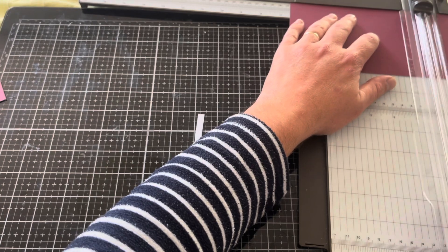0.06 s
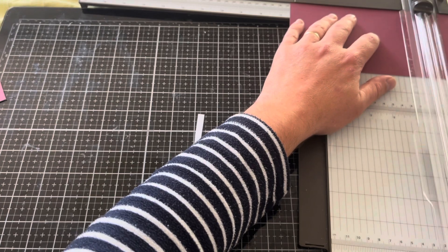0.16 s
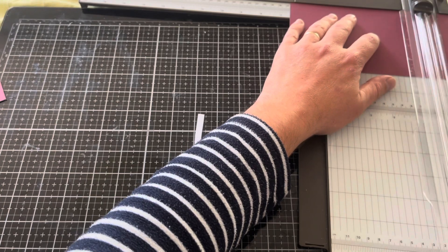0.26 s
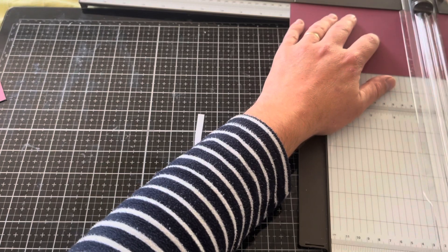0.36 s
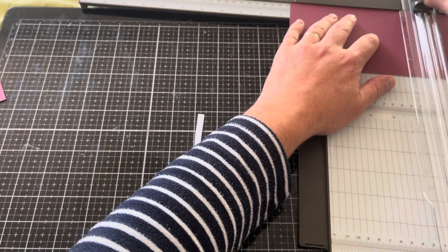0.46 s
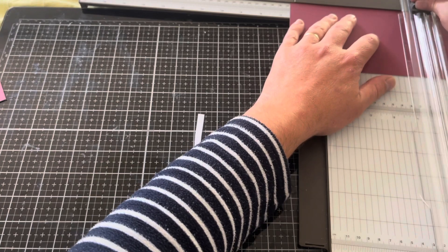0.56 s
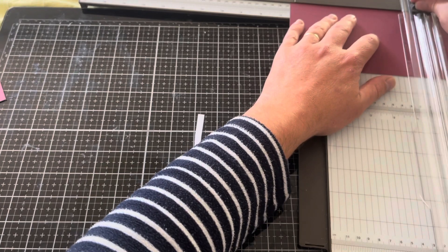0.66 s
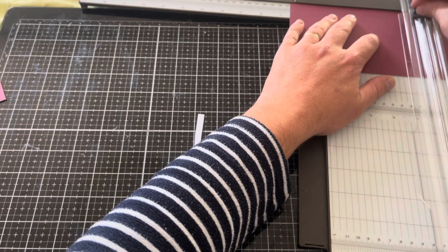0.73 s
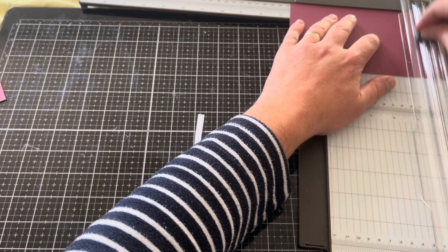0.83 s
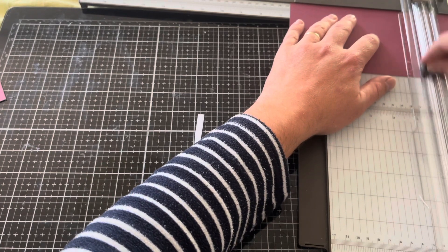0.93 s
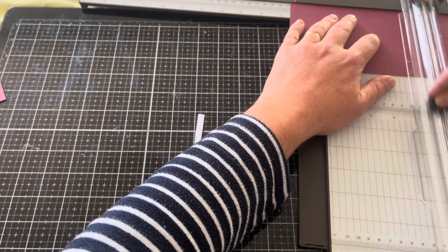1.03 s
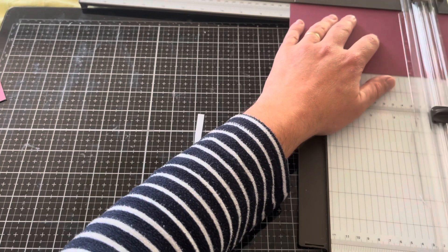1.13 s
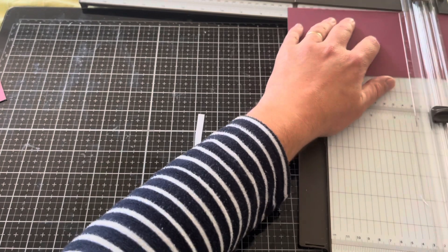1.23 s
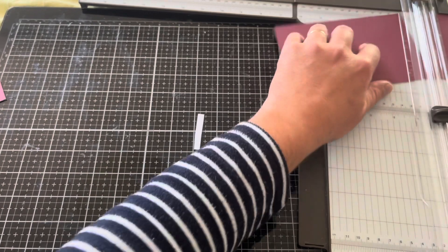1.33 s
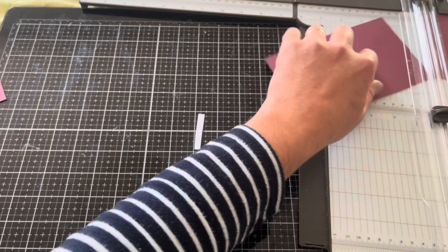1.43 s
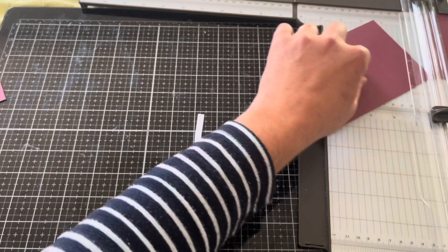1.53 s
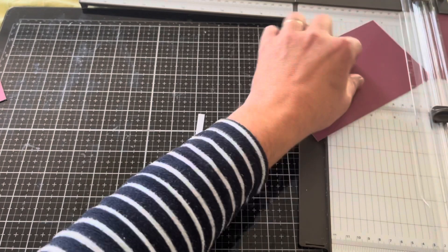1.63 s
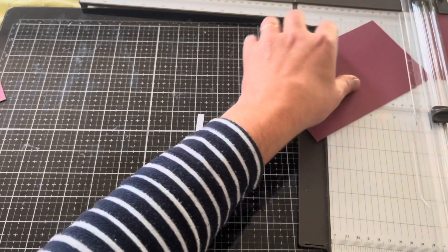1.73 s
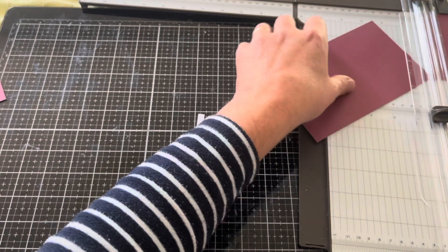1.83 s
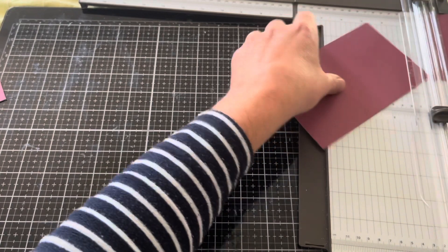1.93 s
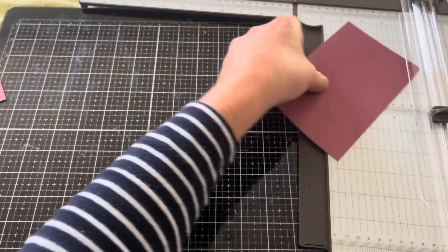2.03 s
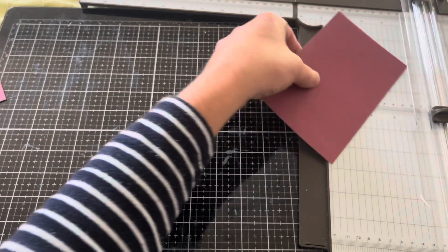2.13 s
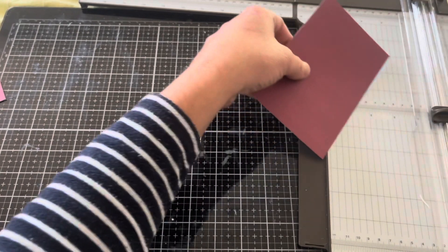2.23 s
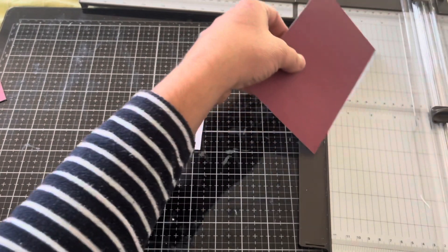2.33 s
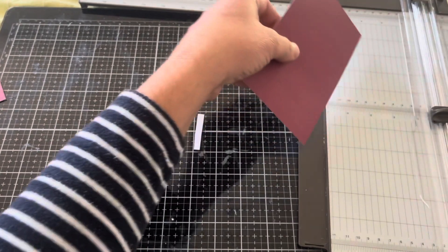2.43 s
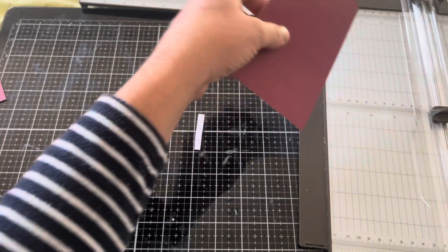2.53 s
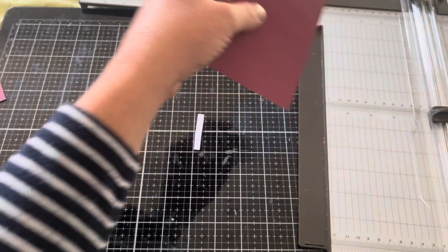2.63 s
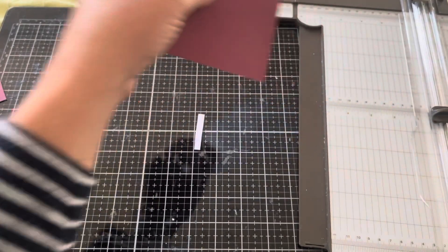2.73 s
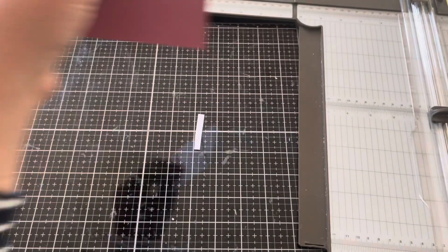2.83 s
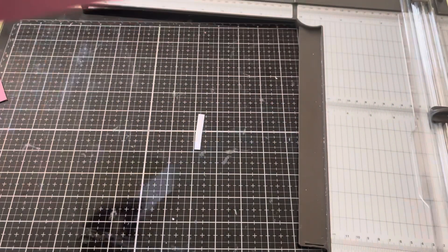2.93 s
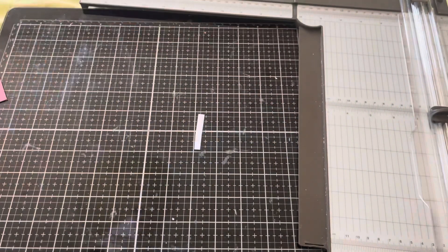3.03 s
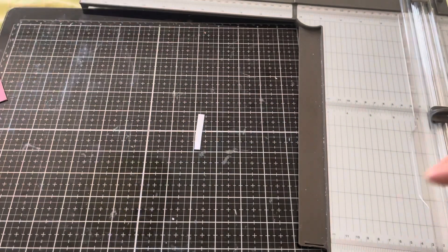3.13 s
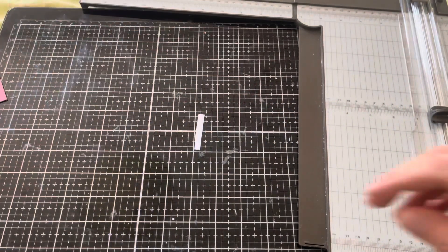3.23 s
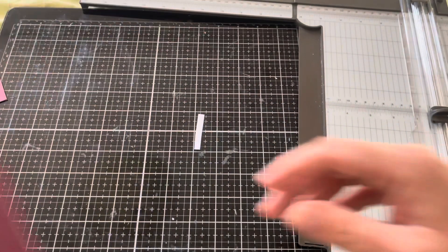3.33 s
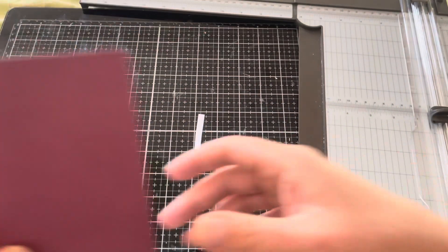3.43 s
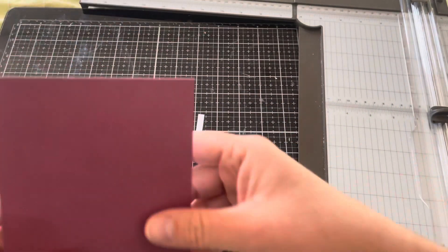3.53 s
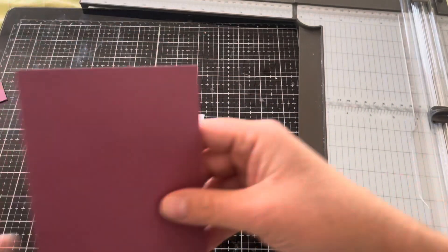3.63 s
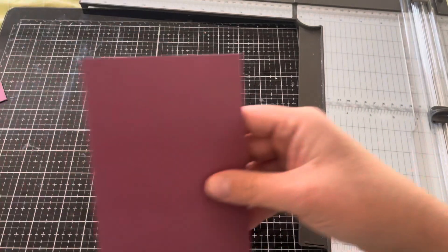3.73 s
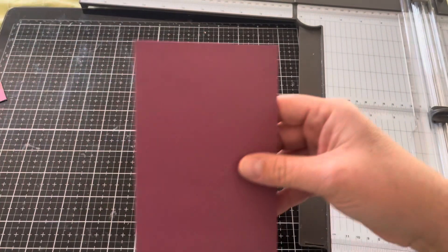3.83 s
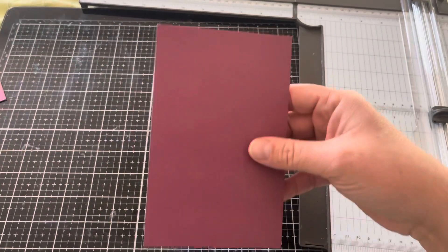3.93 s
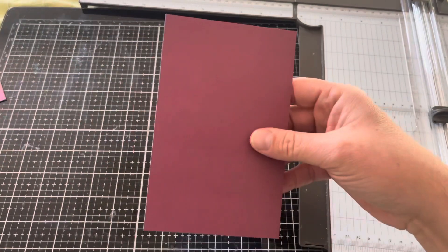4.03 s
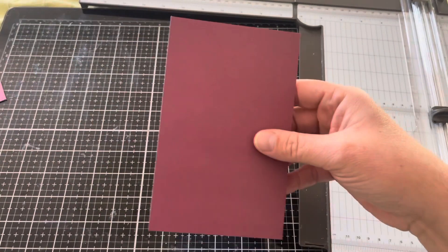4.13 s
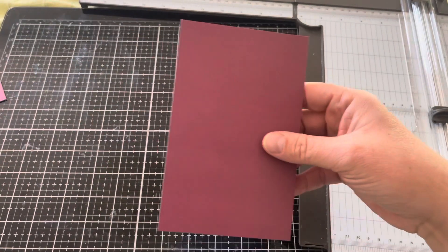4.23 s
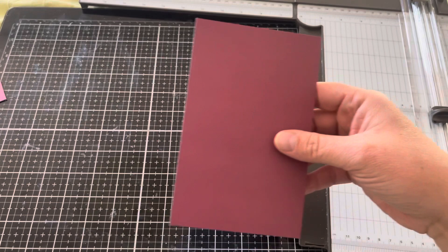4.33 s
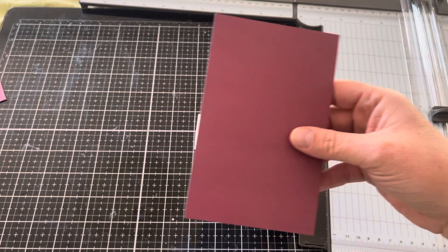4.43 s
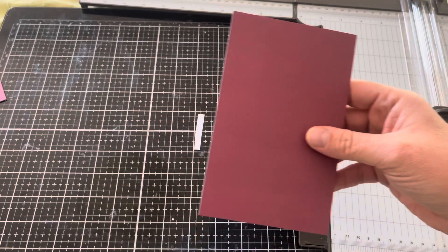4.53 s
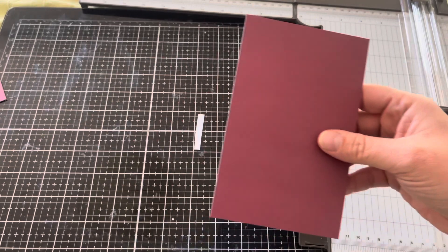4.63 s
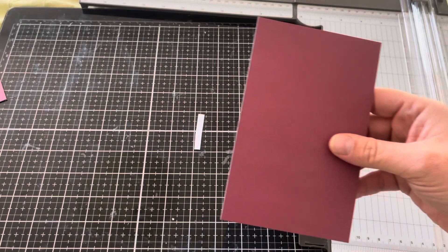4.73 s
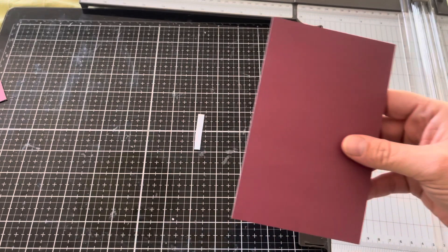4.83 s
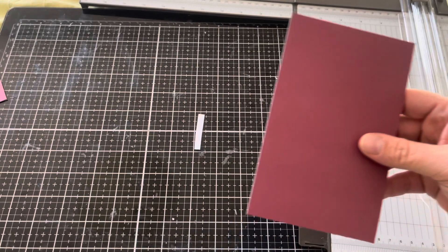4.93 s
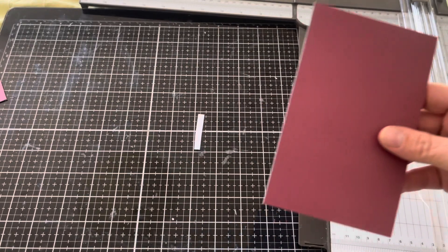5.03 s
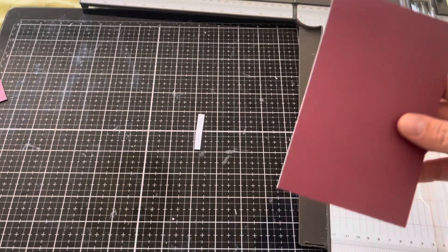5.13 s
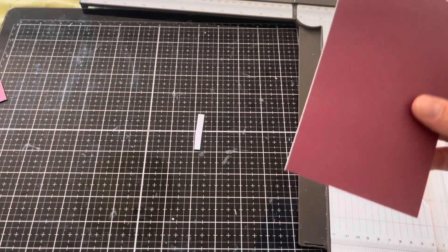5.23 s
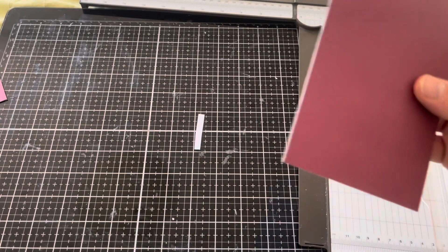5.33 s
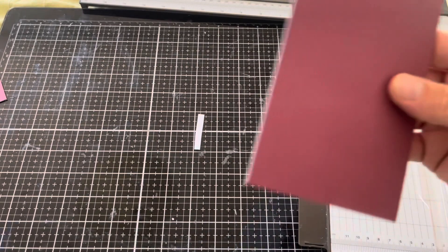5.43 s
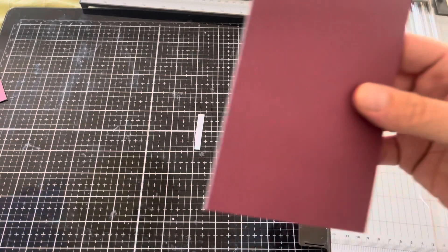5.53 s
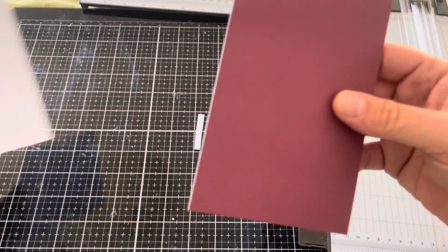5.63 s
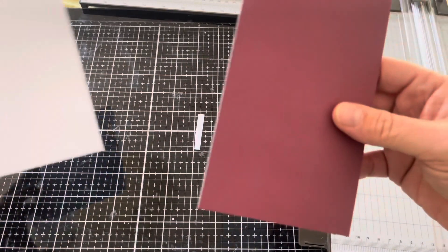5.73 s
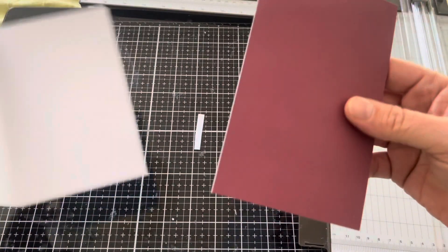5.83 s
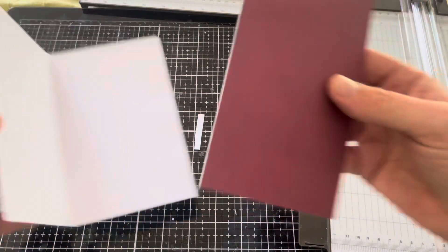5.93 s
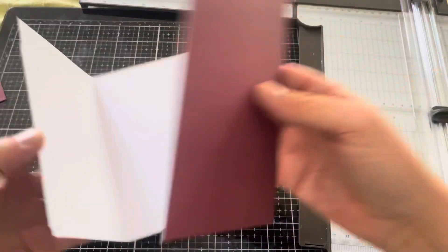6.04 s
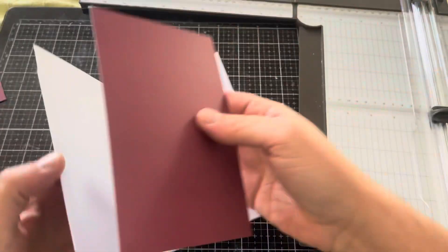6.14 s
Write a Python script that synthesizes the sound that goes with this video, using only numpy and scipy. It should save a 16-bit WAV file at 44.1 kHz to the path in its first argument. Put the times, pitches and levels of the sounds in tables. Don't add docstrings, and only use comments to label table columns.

```python
import sys
import numpy as np
from scipy import signal
from scipy.fft import rfft, irfft, next_fast_len
from scipy.io import wavfile
from scipy.ndimage import uniform_filter1d, map_coordinates

SR = 44100
rng = np.random.default_rng(int(sys.argv[2]) if len(sys.argv) > 2 else 0)


def digitize_waveform(pressure):
    field = np.atleast_2d(pressure).T
    bounded = np.clip(field, -1, 1)
    quanta = np.round(bounded * 32767).astype(np.int16)
    wavfile.write(sys.argv[1], SR, quanta)


def decibels_to_gain(level_db):
    exponent = np.asarray(level_db, float) / 20
    return 10 ** exponent


N = 272097

# (frequency [Hz], density [dB per Hz])
HUM_SPECTRUM = [(15, -45), (25, -24), (39, -11), (62, 0), (120, -3), (160, -9), (310, -14), (400, -23),
                (465, -23), (495, -16), (525, -22), (790, -31), (1300, -41), (2500, -52), (5000, -57),
                (8500, -51), (12200, -60), (12900, -85), (16000, -95)]
# (frequency [Hz], correlation [0-1])
HUM_LIKENESS = [(60, 0.99), (130, 0.95), (290, 0.81), (640, 0.57), (1400, 0.012), (3100, 0.98), (6800, 1),
                (15000, 0.091)]
HUM_DB = -51

# (frequency [Hz], density [dB per Hz])
CARD_SPECTRUM = [(940, -18.5), (1600, -5.5), (1980, -6), (2810, -5), (4110, -8), (4680, -12.5), (6500, -15),
                 (8450, -33.5), (14300, -120)]
EDGE_SPECTRUM = [(3500, -31), (5000, -13.5), (6200, -12), (8700, 0.5), (9850, -3.5), (10100, -27),
                 (10450, -29), (10750, -6.5), (12000, -15.5), (12600, -38), (14000, -49.5), (16600, -73)]
BASE_SPECTRUM = [(76, -29), (130, -2.5), (286, -6.5), (325, -6.5), (385, -8.5), (457, -4.5), (630, -1),
                 (929, -6), (2000, -16.5), (2600, -36.5), (4400, -120)]
STEEL_SPECTRUM = [(11300, -60), (11900, 10.5), (12900, 7), (13300, -40), (14100, -40), (14500, -5),
                  (15700, -4.5), (16400, -68)]
# (frequency [Hz], width [Hz], level [dB])
RAIL_MODES = [(540, 110, -5.5), (900, 130, -6.5), (1210, 81, -0.5), (1700, 750, -5.5)]
BLADE_MODES = [(2150, 110, 0.5), (2866, 700, -4), (4700, 3700, -7.5), (5580, 370, -11)]

# (time [s], card [dB], edge re card [dB], base re card [dB])
SHIVERS = [(0, -73, -24, 17), (0.551, -41.5, 0.5, 10), (.965, -55, 1, 9.5), (1.099, -72, 0, 22),
           (1.796, -56, 0, 17), (2.027, -60.5, -20, 21), (2.155, -68, 10, 17.5), (2.504, -59.5, -2.5, 9),
           (2.565, -69, 1, 10.5), (3.6, -69, -7.5, 10), (5.548, -55, -0.5, 8)]
SHIVER_RISE_DB_PER_S, SHIVER_FALL_DB_PER_S = 2998.5, 184
SHIVER_EDGE_POWER = 1.3
# (full-speed time [s], hold [s], card [dB], edge re card [dB], base re card [dB])
SLIDES = [
    (.135, 0.0039, -98, 16, -8),
    (.46, 0.023, -77.5, -25, 14),
    (1.2, 0.036, -69, 2, 4),
    (1.27, 0.033, -66, 7, -25),
    (1.33, .15, -65, 4, -4),
    (1.65, 0.017, -76, -2, 13.5),
    (1.74, 0.064, -70.5, 10.5, 9),
    (1.92, 0.032, -60.5, 9, 9.5),
    (2.05, 0.066, -69.5, 11, -6),
    (2.3, 0.063, -77.5, -6, 7),
]
SLIDE_RISE_DB_PER_S, SLIDE_FALL_DB_PER_S = 422.5, 258.5
# (time [s], hold [s], card [dB], edge re card [dB], base re card [dB])
GRIPS = [(.405, 0.0067, -97, -16.5, -5), (.494, 0.037, -59, -22, 16.5), (.7, 0.0073, -54.5, 3, -0.5),
         (1.0705, 0.019, -52, -16, 12.5), (1.277, 0.015, -68.5, -9, -23), (1.81, 0.028, -51, 2.5, 9),
         (1.958, 0.018, -60.5, 12, 7), (1.975, 0.032, -58, 14.5, 5), (3.538, 0.05, -62.5, 3, 18.5),
         (5.485, 0.049, -70.5, -12, 17.5), (5.885, .015, -71.5, -5, -7.5)]
GRIP_RISE_DB_PER_S, GRIP_FALL_DB_PER_S = 5002.5, 699.5
# (full-speed time [s], hold [s], card [dB], edge re card [dB], base re card [dB])
CUT = [
    (.72, 0.22, -50.5, 6.5, -14),
    (.79, 0.22, -56.5, -4, 5),
    (.81, 0.055, -56, -8.5, -12),
]
CUT_RISE_DB_PER_S, CUT_FALL_DB_PER_S = 298, 3000
# (full-speed time [s], hold [s], level [dB])
SCRAPES = [
    (.69, .025, -62),
    (.745, 0.039, -48),
    (.79, 0.072, -43.5),
    (.88, 0.064, -51),
    (1.797, 0.033, -56),
    (1.918, .03, -64),
    (1.97, .045, -67),
]
SCRAPE_RISE_DB_PER_S, SCRAPE_FALL_DB_PER_S = 900, 1500
# (full-speed time [s], hold [s], card [dB], edge re card [dB])
STROKES = [(2.69, 0.027, -93, -16.5), (2.785, 0.043, -76, 6.5), (2.9, 0.07, -76, 3),
           (3.04, 0.0084, -83.5, -5.5), (3.175, 0.011, -84, 4.5), (4.09, 0.035, -82.5, 1.5),
           (4.17, 0.025, -69.5, 7.5), (4.31, 0.025, -77, 0.5), (4.374, 0.0088, -82.5, 6),
           (4.63, 0.018, -68.5, 8), (4.77, .015, -74, -4), (4.83, 0.037, -77.5, 14),
           (4.9, 0.076, -68.5, 10.5), (5.07, 0.078, -87, 15), (5.215, 0.032, -77, -2),
           (5.919, 0.019, -70.5, 7), (6.031, 0.073, -78, -20.5)]
STROKE_RISE_DB_PER_S, STROKE_FALL_DB_PER_S, STROKE_BASE_DB = 604, 273, -4

# (time [s], snap [dB], bright [dB], left-right [dB])
TICKS = [(0.1342, -75, 15, -1), (2.5025, -53, -1, 4), (2.5597, -45.5, 6.5, -0.5), (3.527, -43.5, -3, -1),
         (3.536, -41.5, -7, 6), (3.56, -42.5, -10.5, 10), (3.5692, -47.5, 0.5, -3), (3.597, -67.5, 8, 0),
         (5.168, -65, 5.5, -1), (5.483, -55, -9, 4), (5.5265, -66, 9.5, -6.5), (5.5414, -38.5, -4, 2),
         (5.547, -45.5, 7, 0), (6.0285, -59, -17.5, 0), (6.063, -60.5, -20.5, 16.5), (3.6095, -64, -11, 0)]
TICK_BODY_DB, TICK_T60_S = -4, 0.014
# (time [s], snap [dB], bright [dB], body [dB], t60 [s])
SNAPS = [(0.4923, -45, -19, 0, 0.032), (0.512, -28.5, -15, -3.5, 0.069), (0.5209, -23.5, -7, -4, 0.061),
         (0.5264, -13, -13, 3.5, 0.016), (.529, -12.5, 0, -0.5, 0.011), (0.5344, -25, -3, -1, 0.034),
         (0.54, -29, -2.5, 2.5, 0.033), (1.7859, -46, 1, 5, 0.022), (1.7963, -33.5, 3, 6.5, 0.047),
         (1.8138, -40, 1, 7, 0.026), (1.821, -39, 8.5, 7, 0.016)]
# (time [s], snap [dB], bright [dB], body [dB])
KNOCKS = [(0.9519, -30.5, -1, 1), (1.0236, -46, -12.5, 8), (1.0447, -45, -8, 11), (1.0702, -39.5, -4.5, 3),
          (1.0828, -38, -18, 2.5), (1.2788, -46, -8.5, -25), (1.3583, -62, 1, 12), (1.6575, -59.5, 3, 3),
          (1.7695, -58, -18, 17), (1.8367, -45.5, 10.5, 6), (1.8971, -43.5, -0.5, 2),
          (1.9212, -36.5, -3, -8), (1.962, -48, -15, 11.5), (2.02, -40, -12, 0), (2.026, -53, -21.5, 14),
          (1.963, -57, 3, -12), (2.149, -47, -15, 2), (5.487, -59, -20, 5), (6.045, -66.5, -21.5, 7.5),
          (6.086, -68.5, -19, 5.5), (6.1644, -59, -20, 12.5)]
KNOCK_PAN_DB, KNOCK_T60_S = -0.5, 0.0248
PLASTIC_TOP_HZ, HIT_TOP_HZ = 8200, 13000

SNAP_RINGS = [(.4945, -36, 1200, 0.042), (.528, -8.5, 2430, 0.02), (.5285, -14, 2860, 0.027),
              (.5293, -4, 1210, 0.016), (.5296, -5.5, 1650, 0.018), (.529, -21.5, 533, 0.13),
              (.529, -26, 315, 0.099), (.528, -35, 4000, 0.011), (0.527, -26, 4394, 0.014),
              (.528, -26, 11100, .01), (.528, -22.5, 6080, .015), (0.529, -25.5, 6777, 0.015),
              (0.527, -21.5, 9800, .012), (0.53, -41.5, 69.54, 0.088), (.5345, -21, 2020, 0.03),
              (0.531, -9, 1380, 0.0093), (0.5307, -17.5, 1660, .02), (.531, -20, 2300, .012),
              (.535, -24, 937, .06), (.544, -28, 1300, .06), (.552, -30, 755, .08), (0.65, -32.5, 66, 0.18),
              (1.797, -26, 832, 0.06), (1.806, -22.5, 1500, 0.028), (1.8145, -30.5, 11000, .012),
              (1.821, -28, 8900, .012), (1.837, -33, 6050, .015), (1.85, -47, 3400, .04),
              (1.799, -30, 690, 0.071), (1.799, -26, 1210, 0.06), (1.8, -25, 1620, 0.034),
              (1.803, -24.5, 2100, 0.021), (1.8215, -36, 4300, .012), (1.5, -40, 57, 0.18)]
CONTACT_RINGS = [(0.9532, -20.5, 3320, 0.0075), (0.954, -19, 2370, 0.0065), (0.954, -28, 4440, 0.0092),
                 (0.956, -29.5, 1430, 0.011), (.956, -23.5, 650, 0.018), (.96, -40, 70, .15),
                 (1.0243, -33.5, 1900, 0.017), (1.0245, -41, 4163, 0.006), (1.0245, -41, 3000, 0.0056),
                 (1.054, -39, 2250, 0.018), (1.063, -35, 660, .04), (1.074, -38, 2300, .015),
                 (1.0828, -39, 5200, .008), (1.0865, -32, 760, 0.012), (1.096, -38, 1030, 0.019),
                 (1.099, -40, 2000, .01), (1.043, -35, 2260, 0.014), (1.046, -47, 900, .015),
                 (1.0715, -37.5, 4230, 0.014), (1.083, -36, 3460, 0.012), (1.085, -29.5, 693, 0.037),
                 (1.087, -40, 1500, 0.016), (1.658, -44.5, 1100, 0.016), (1.897, -40.5, 1780, 0.018),
                 (1.898, -40, 4000, 0.006), (1.9125, -37, 3500, 0.0065), (1.941, -34, 700, .016),
                 (1.959, -37, 6000, .008), (1.9645, -33, 5600, .009), (1.922, -32, 7700, .01),
                 (1.9215, -44, 4860, .012), (1.962, -35, 2210, .012), (1.968, -26.5, 680, .02),
                 (1.958, -35, 600, .02), (2.019, -32.5, 3280, 0.0075), (2.0255, -26, 640, 0.021),
                 (2.0232, -31, 900, .012), (2.001, -34, 9200, .02), (2.03, -39, 271, 0.098),
                 (1.078, -33.5, 1130, 0.034), (2.031, -40, 1300, 0.028), (2.042, -43, 900, .015),
                 (2.1498, -37, 2710, 0.01), (2.149, -35.5, 2010, 0.018), (2.149, -45.5, 3640, .006),
                 (2.151, -38.5, 1455, 0.025), (2.154, -40.5, 875, 0.026), (3.554, -31, 450, .02),
                 (5.484, -47, 1080, 0.17), (5.484, -51.5, 838, 0.1), (5.484, -54, 3190, 0.037),
                 (5.49, -52, 1980, 0.057), (5.5465, -34.5, 6470, 0.015), (5.5458, -39.5, 4760, 0.013),
                 (6.165, -46, 2380, 0.017),
                 (1.279, -50, 2270, 0.14), (1.279, -57.5, 3200, 0.18), (1.358, -49.5, 855, 0.062),
             (2.505, -51.5, 1607, 0.061), (2.557, -40.5, 3340, 0.014), (2.5576, -44.5, 4666, 0.012),
             (3.527, -42.5, 5040, 0.0053), (.41, -69, 2000, 0.018), (.44, -61, 1500, .02),
             (0.439, -59, 3000, .015), (5.55, -56, 2100, .2), (5.55, -58, 6700, .15),
             (5.55, -64, 4200, 0.17), (5.55, -59, 8500, 0.16), (3.527, -47, 1310, 0.014),
             (3.538, -36.5, 2410, 0.01), (3.5367, -38, 5380, 0.0063), (3.5607, -44.5, 1614, 0.011),
             (3.568, -50, 3710, 0.012), (3.589, -53, 1480, 0.022), (3.593, -52, 2676, 0.022),
             (4.308, -63, 1307, .09), (2.386, -62, 4500, .004), (2.5601, -37, 4500, .006),
             (2.5605, -43, 6500, .006), (2.553, -51, 5500, 0.033), (3.56, -44, 4300, .007),
             (3.5694, -41, 5500, 0.0056), (3.6093, -55, 4800, .005), (3.6095, -54, 1500, .012),
             (4.635, -62, 876, 0.23), (4.635, -64, 2293, 0.086), (5.55, -51, 5314, 0.12),
             (5.549, -59, 3330, 0.13)]
RING_RISE_CYCLES = 0.53

# (time [s], level [dB], t60 [s])
BOOMS = [
    (0.532, -32, 0.15),
    (0.957, -29.5, 0.12),
    (1.813, -29.5, 0.2),
    (2.023, -48, 0.21),
    (2.503, -32.5, 0.13),
    (3.544, -42.5, 0.33),
    (3.601, -48.5, 0.077),
    (5.551, -36, 0.15),
]
# (time [s], hold [s], start [Hz], end [Hz], level [dB])
STRIP = [
    (.705, .075, 8900, 8400, -50),
    (.79, 0.14, 9300, 7570, -51),
    (.71, 0.066, 3910, 3390, -51),
    (.81, 0.064, 2400, 1900, -52),
    (.86, .06, 7300, 6570, -54),
    (.9, .04, 4430, 4450, -56),
    (1.974, .03, 6100, 6400, -47.5),
    (1.985, .03, 3010, 3400, -55),
    (5.56, 0.066, 2100, 2100, -67),
    (5.56, 0.092, 5300, 5200, -69.5),
]
STRIP_WIDTH_PER_HZ, STRIP_FADE_DB_PER_S = 0.07, 498
# (time [s], level [dB], frequency [Hz])
FLAPS = [(0.954, -27, 360), (1.082, -43, 540), (2.025, -43, 650), (2.509, -39, 458), (3.536, -33, 234.7),
         (3.548, -31.5, 208), (3.551, -23.5, 442), (3.554, -24, 244), (3.565, -25, 286), (3.573, -25, 603),
         (3.58, -29.5, 454), (3.585, -25.5, 316), (3.593, -24.5, 517), (3.604, -30.5, 189),
         (3.612, -28.5, 208.3), (5.542, -33.5, 368)]
# (full-strength time [s], hold [s], frequency [Hz], level [dB])
SQUEAKS = [
    (2.66, 0.049, 3826, -73),
    (2.74, 0.05, 3770, -74),
    (2.994, 0.026, 1376, -78),
]
SQUEAK_RISE_DB_PER_S, SQUEAK_FALL_DB_PER_S = 500, 400
LONG_SQUEAK = [
    (4.53, 0.055, 1368, -66),
]
LONG_RISE_DB_PER_S, LONG_FALL_DB_PER_S = 130, 55
# (time [s], hold [s])
LONG_CONTACT = [
    (4.46, .31),
]

# (frequency [Hz], t60 [s])
WALL_T60 = [(200, 0.16), (1000, 0.2), (4000, 0.36), (10000, .18)]
# (frequency [Hz], left lead [rad])
PORT_LEAD = [(100, .1), (1000, .6), (2000, .8), (4000, .75), (8500, 1.9), (12000, 1.2)]
# (frequency [Hz], left-right [dB])
PORT_TILT = [(100, -0.5), (700, -1.5), (1300, -0.5), (2400, 3), (4400, 6.5), (8000, 0.5)]


def unit(x):
    return x / np.sqrt(np.mean(x ** 2) + 1e-20)


def along(points, hz):
    f, v = np.transpose(points)
    return np.interp(np.log(hz + 1), np.log(f + 1), v)


def wobble(rate_hz):
    knots = rng.standard_normal(int(N * rate_hz / SR) + 4)
    return map_coordinates(knots, [np.arange(N) * rate_hz / SR])


def filtered(x, response):
    size = next_fast_len(x.shape[-1] + 4096)
    spectrum = rfft(x, size) * response(np.fft.rfftfreq(size, 1 / SR))
    return irfft(spectrum, size)[..., :x.shape[-1]]


def coloured(x, spectrum):
    return unit(filtered(x, lambda hz: decibels_to_gain(along(spectrum, hz))))


def modes(table):
    def response(f):
        return sum((-1) ** k * decibels_to_gain(db) * 1j * f * width / (hz * hz - f * f + 1j * f * width)
                   for k, (hz, width, db) in enumerate(table))
    return response


def varied(table, spread_db):
    return [(hz * (1 + 0.03 * rng.standard_normal()), width, db + spread_db * rng.standard_normal())
            for hz, width, db in table]


def moves(rows, rise_db_per_s, fall_db_per_s):
    gain = np.zeros((len(rows), N))
    for g, (s, hold_s, *_) in zip(gain, rows):
        start = max(int((s - 0.4) * SR), 0)
        stop = min(int((s + hold_s + 0.6) * SR), N)
        t = np.arange(start, stop) / SR
        rise_db = rise_db_per_s * np.clip(s - t, 0, None)
        fall_db = fall_db_per_s * np.clip(t - s - hold_s, 0, None)
        g[start:stop] = decibels_to_gain(-rise_db - fall_db)
    return gain


def hum():
    def spread(hz):
        angle = np.arccos(np.clip(along(HUM_LIKENESS, hz), -1, 1)) / 2
        return decibels_to_gain(along(HUM_SPECTRUM, hz)) * [np.cos(angle), np.sin(angle)]

    mid, side = filtered(rng.standard_normal((2, N)), spread)
    return decibels_to_gain(HUM_DB - 1 + 0.8 * wobble(3)) * unit(np.array([mid + side, mid - side]))


def fibres(grit_db, patchy_db):
    grit = rng.standard_normal(N) * decibels_to_gain(grit_db * wobble(700) + 0.4 * grit_db * wobble(60))
    z = signal.stft(grit, nperseg=512)[2]
    field = uniform_filter1d(rng.standard_normal(z.shape), size=5, axis=0)
    field = uniform_filter1d(field, size=13, axis=1)
    return signal.istft(z * decibels_to_gain(patchy_db * unit(field)), nperseg=512)[1][:N]


def friction():
    shivers = [(s, 0, *db) for s, *db in SHIVERS]
    strokes = [(*row, STROKE_BASE_DB) for row in STROKES]
    kinds = [(GRIPS, GRIP_RISE_DB_PER_S, GRIP_FALL_DB_PER_S, 1),
             (SLIDES, SLIDE_RISE_DB_PER_S, SLIDE_FALL_DB_PER_S, 1),
             (strokes, STROKE_RISE_DB_PER_S, STROKE_FALL_DB_PER_S, 1),
             (shivers, SHIVER_RISE_DB_PER_S, SHIVER_FALL_DB_PER_S, SHIVER_EDGE_POWER),
             (CUT, CUT_RISE_DB_PER_S, CUT_FALL_DB_PER_S, 1)]
    card = edge = base = 0
    for rows, rise, fall, edge_power in kinds:
        gain = moves(rows, rise, fall)
        card_db, edge_db, base_db = np.array(rows).T[2:]
        card = card + decibels_to_gain(card_db) @ gain
        edge = edge + decibels_to_gain(card_db + edge_db) @ gain ** edge_power
        base = base + decibels_to_gain(card_db + base_db) @ gain
    steel = decibels_to_gain(np.array(SCRAPES)[:, 2]) @ moves(SCRAPES, SCRAPE_RISE_DB_PER_S, SCRAPE_FALL_DB_PER_S)
    grit = fibres(grit_db=1.1, patchy_db=2.7)
    tone = card * coloured(grit, CARD_SPECTRUM) + edge * coloured(grit, EDGE_SPECTRUM)
    tone = tone + base * decibels_to_gain(-3.0) * coloured(grit, BASE_SPECTRUM)
    return decibels_to_gain(3.0) * tone + steel * coloured(grit, STEEL_SPECTRUM)


def peak(x):
    return x / np.abs(x).max()


def clicks():
    out, t = np.zeros((2, N + SR)), np.arange(SR // 14) / SR
    contacts = [(*row, KNOCK_PAN_DB, KNOCK_T60_S) for row in KNOCKS]
    contacts += [(s, db, bright_db, TICK_BODY_DB, pan_db, TICK_T60_S) for s, db, bright_db, pan_db in TICKS]
    contacts += [(*row, KNOCK_PAN_DB, t60_s) for *row, t60_s in SNAPS]
    for s, db, bright_db, body_db, pan_db, t60_s in contacts:
        rattle = rng.standard_normal(len(t)) * (1 - np.exp(-t / (0.05 * t60_s)))

        def burst(longer):
            return rattle * decibels_to_gain(-60 * t / max(longer * t60_s, 0.003))

        snap = peak(filtered(burst(1.0), modes(varied(BLADE_MODES, spread_db=4.0))))
        body = decibels_to_gain(body_db + 4.0) * peak(filtered(burst(1.6), modes(varied(RAIL_MODES, spread_db=2.0))))
        bright = decibels_to_gain(bright_db + 9.0) * peak(coloured(burst(0.91), EDGE_SPECTRUM))
        dull = filtered(snap + body, lambda hz: 1 / (1 + 1j * hz / PLASTIC_TOP_HZ) ** 2)
        pan = np.array([[pan_db], [-pan_db]]) / 2
        out[:, round(s * SR):][:, :len(t)] += decibels_to_gain(db + pan) * (dull + bright)
    return out[:, :N]


def rings():
    out, t = np.zeros(N + SR), np.arange(SR // 3) / SR
    for s, db, hz, t60_s in SNAP_RINGS + CONTACT_RINGS:
        envelope = decibels_to_gain(db - 60 * t / max(t60_s, 0.003)) * (1 - np.exp(-t * hz / RING_RISE_CYCLES))
        out[round(s * SR):][:len(t)] += np.sin(2 * np.pi * hz * t) * envelope
    return out[:N]


def booms():
    out, t = np.zeros(N + SR), np.arange(SR // 3) / SR
    for s, db, t60_s in BOOMS:
        envelope = decibels_to_gain(db + 8.0 - 60 * t / t60_s) * (1 - np.exp(-t / 0.033))
        out[round(s * SR):][:len(t)] += np.sin(2 * np.pi * 110 * t) * envelope
    return out[:N]


def strip():
    out, gain = np.zeros(N), moves(STRIP, STRIP_FADE_DB_PER_S, STRIP_FADE_DB_PER_S)
    knots = rng.standard_normal((len(STRIP), 2, SR // 10))
    for (s, hold_s, from_hz, to_hz, db), g, pair in zip(STRIP, gain, knots):
        on = np.flatnonzero(g > 1e-4)
        glide = np.clip((on / SR - s) / hold_s, 0, 1)
        cycles = np.cumsum(from_hz + (to_hz - from_hz) * glide) / SR
        a, b = [map_coordinates(k, [STRIP_WIDTH_PER_HZ * cycles], mode="wrap") for k in pair]
        noise = a * np.sin(2 * np.pi * cycles) + b * np.cos(2 * np.pi * cycles)
        out[on] += decibels_to_gain(db) * g[on] * noise
    return out


def flaps():
    out, t = np.zeros(N + SR), np.arange(SR // 3) / SR
    for s, db, hz in FLAPS:
        envelope = decibels_to_gain(db + 5.0 - 60 * t / 0.021) * (1 - np.exp(-t / 0.0016))
        out[round(s * SR):][:len(t)] += np.sin(2 * np.pi * hz * t) * envelope
    return out[:N]


def squeaks():
    hz, db = np.array(SQUEAKS + LONG_SQUEAK).T[2:, :, None]
    fuzz = 1.25 * (hz / 3800) ** 2 * wobble(180)
    phase = 2 * np.pi * np.cumsum(hz * (1 + 0.016 * fuzz), axis=1) / SR
    tones = decibels_to_gain(db + 2.5 + 3.5 * fuzz) * np.sin(phase)
    short = moves(SQUEAKS, SQUEAK_RISE_DB_PER_S, SQUEAK_FALL_DB_PER_S)
    long = moves(LONG_SQUEAK, LONG_RISE_DB_PER_S, LONG_FALL_DB_PER_S)
    contact = moves(LONG_CONTACT, SQUEAK_RISE_DB_PER_S, SQUEAK_FALL_DB_PER_S)
    return (np.vstack([short, long * contact]) * tones).sum(axis=0)


def room(x):
    hz, t, z = signal.stft(rng.standard_normal((2, SR // 2)), SR, nperseg=256)
    decay = decibels_to_gain(-60 * t / along(WALL_T60, hz)[:, None])
    tail = signal.istft(z * decay, SR, nperseg=256)[1]
    delayed = np.pad(x, (200, 0))[None]
    return signal.fftconvolve(delayed, tail / np.linalg.norm(tail[0]), axes=1)[:, :N]


def ports(pair):
    side = np.array([[0.5], [-0.5]])
    return filtered(pair, lambda hz: decibels_to_gain(side * along(PORT_TILT, hz)) * np.exp(1j * side * along(PORT_LEAD, hz)))


def scene():
    hits = clicks() + flaps() + booms() + rings()
    rub = friction() + squeaks()
    wet = decibels_to_gain(-15.0) * room(hits.mean(0)) + decibels_to_gain(-7.5) * room(rub)
    soft_hits = filtered(hits, lambda hz: 1 / np.sqrt(1 + (hz / HIT_TOP_HZ) ** 12))
    near = soft_hits + decibels_to_gain(-2) * rub
    return ports(near + strip()) + wet + hum()


def low_pass(x):
    return signal.sosfilt(signal.butter(12, 17000, fs=SR, output="sos"), x)


def record(dry):
    held = dry / (1 + np.abs(dry / 0.86) ** 4) ** 0.25
    mix = filtered(held, lambda hz: (hz < 16500) * decibels_to_gain(-4 * np.exp(-((hz - 10250) / 230) ** 2)))
    return low_pass(mix)


dry = scene()
out = record(dry)
digitize_waveform(out)
```